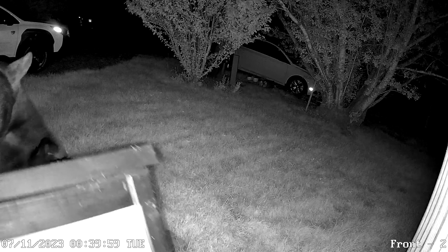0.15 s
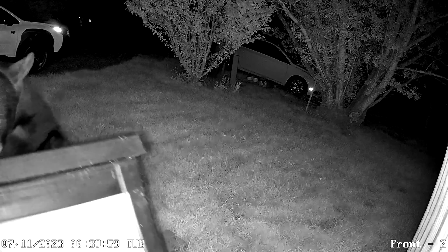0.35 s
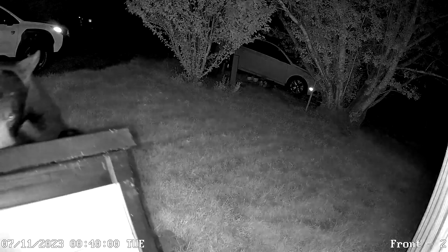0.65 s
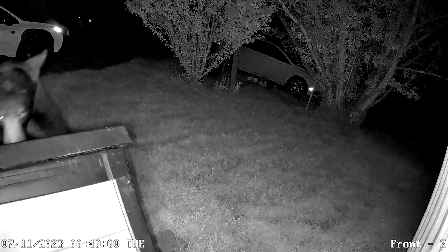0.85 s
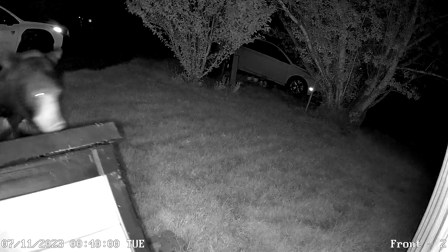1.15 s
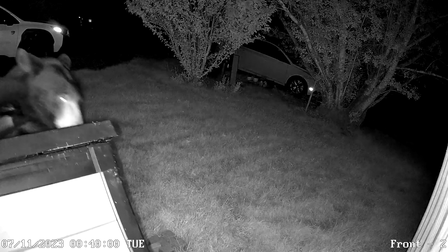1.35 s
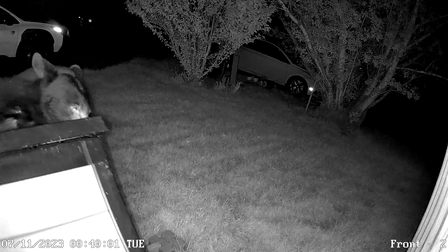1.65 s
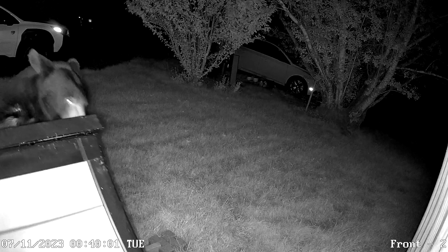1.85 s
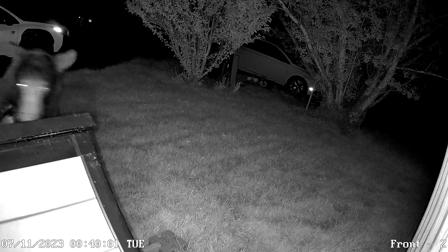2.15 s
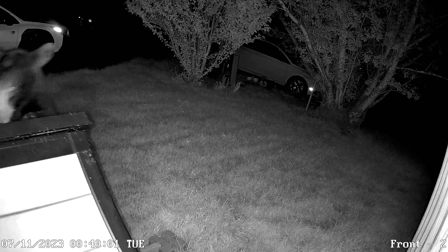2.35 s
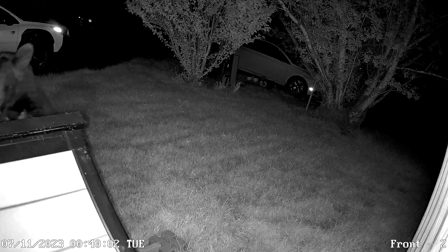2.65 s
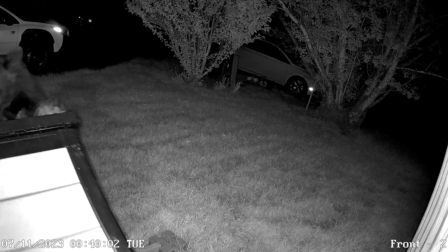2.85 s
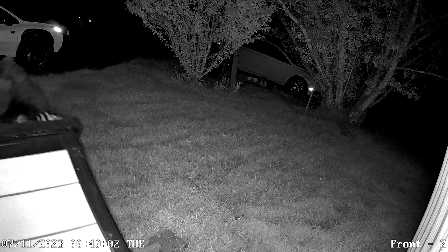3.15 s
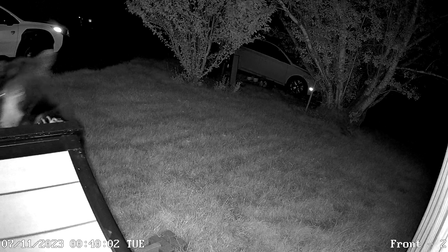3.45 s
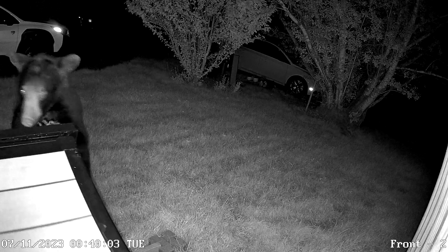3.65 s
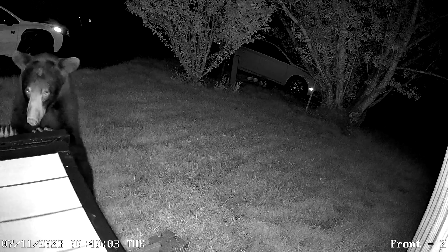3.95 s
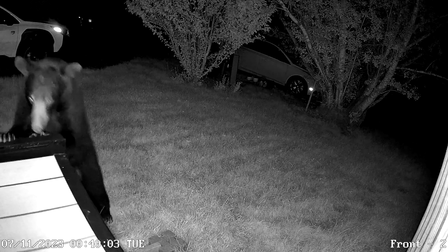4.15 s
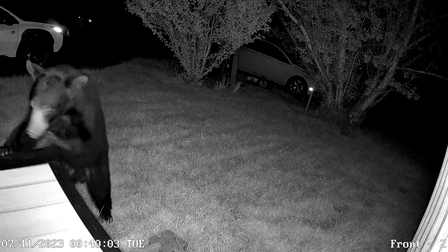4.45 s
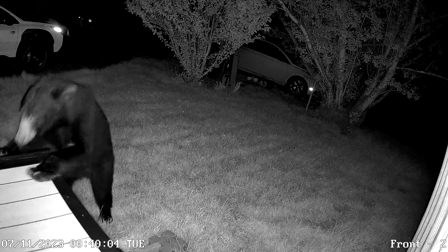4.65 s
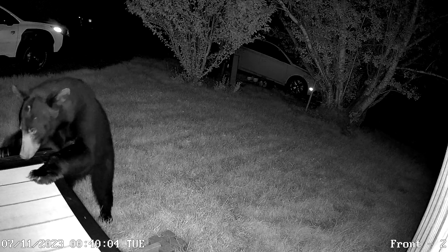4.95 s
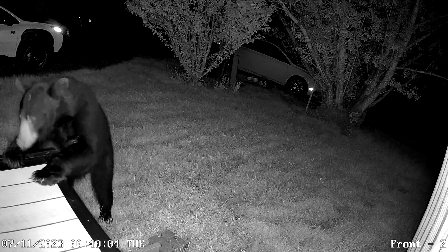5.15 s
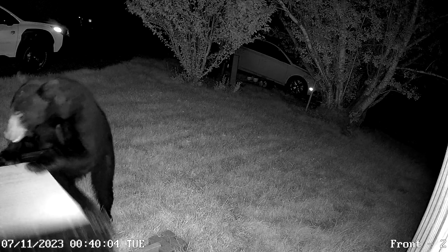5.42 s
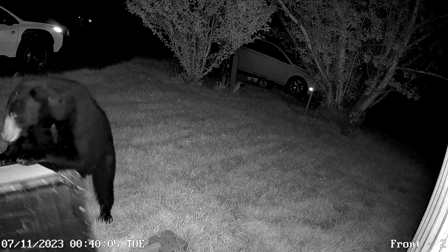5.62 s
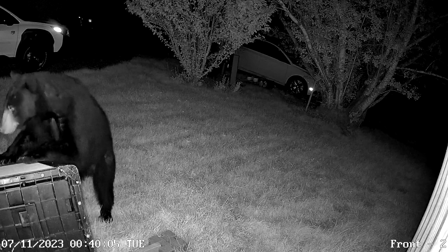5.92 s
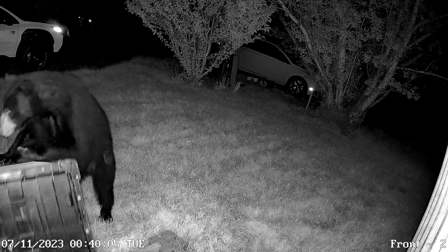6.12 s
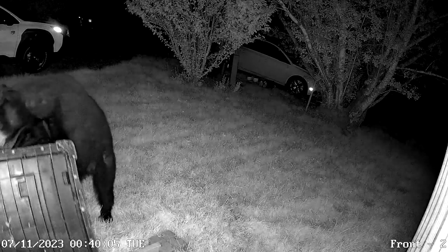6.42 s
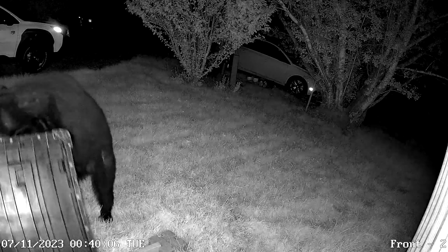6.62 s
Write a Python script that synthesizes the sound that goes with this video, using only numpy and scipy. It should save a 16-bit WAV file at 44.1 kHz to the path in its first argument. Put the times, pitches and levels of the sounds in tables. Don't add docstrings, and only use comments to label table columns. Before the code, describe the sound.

Claws scrape a hard plastic box outdoors, then hollow bangs and gritty dragging build to a loud overloaded slam, followed by faint scratching and two late thumps.

```python
import sys
import numpy as np
from scipy import signal
from scipy.fft import rfft, irfft
from scipy.io import wavfile
from scipy.ndimage import uniform_filter1d

SR = 44100
rng = np.random.default_rng(int(sys.argv[2]) if len(sys.argv) > 2 else 0)


def transcribe(signal):
    frames = np.atleast_2d(signal).T
    limited = np.clip(frames, -1, 1)
    pcm = np.round(limited * 32767).astype(np.int16)
    wavfile.write(sys.argv[1], SR, pcm)


def amplitude_ratio(level_db):
    exponent = np.asarray(level_db, float) / 20
    return 10 ** exponent


N = 298998

RESTING_DB = [-70.5, -73.5, -56, -68]


def drag():
    judder = amplitude_ratio(2.12 * drift(41.0))
    return scraping(judder) + shoving(judder)


# start_s, hold_s, scrape_db, rasp_relative_db
SCRAPES = [(0, 0.039, -52, -11), (.28, 0.24, -56.5, -12), (.5, 0.017, -56.5, -10.5),
           (.62, 0.065, -58.5, -11.5), (.99, 0.14, -44, -11.5), (.12, .1, -60.5, -8),
           (1.14, .17, -40, -11.5), (1.33, 0.078, -47.5, -16), (2.67, .03, -62, -5), (2.92, .02, -55, -6),
           (2.98, .04, -47.5, -14), (3.06, .12, -43.5, -5.5), (3.2, .05, -40.5, -8.5),
           (3.27, 0.026, -32, -4), (3.32, 0.039, -36.5, -8), (3.42, 0.11, -47, -3.5),
           (3.56, 0.012, -49, 5.5), (3.68, 0.19, -50, -1.5), (3.97, 0.061, -52.5, -3),
           (4.09, 0.055, -44.5, -5.5), (4.275, 0.013, -48, 3.5), (4.35, .07, -41.5, -1.5),
           (4.45, 0.033, -30, -6), (4.5, 0.015, -27, -3), (4.55, 0.03, -36, -10), (4.62, 0.037, -40.5, -8),
           (4.8, 0.25, -72, 7.5), (5.07, 0.051, -57.5, -7.5), (5.62, 0.31, -69.5, 1.5),
           (4.69, .05, -48, -13), (6.23, 0.14, -63, -3.5)]
# start_s, hold_s, scrape_db, rasp_relative_db
SKIDS = [(1.104, 0.026, -35.5, -14), (2.003, 0.016, -57, -7), (2.942, 0.017, -39.5, -5.5),
         (3.184, .015, -41.5, -10), (3.272, .02, -39, -4), (3.801, .012, -53, -5),
         (3.922, 0.0069, -29.5, -14.5), (4.254, .012, -44.5, 2.5), (4.635, .015, -38, -1.5),
         (5.578, 0.0038, -54, -2.5), (5.361, 0.0053, -53.5, -13), (5.716, 0.025, -45, -15),
         (6.262, .01, -52, -12)]
# mode_hz, width_hz, level_db
RIBS = [(1050, 646, 7), (1234, 1041, 7.5), (1693, 500, 3.5), (2290, 670, -3), (2478, 1090, -5)]
# mode_hz, width_hz, level_db
GRIT = [(3300, 1100, 2), (4300, 520, 3.5), (4700, 480, 1.5), (5400, 480, 0), (6870, 1300, -14)]


def scraping(judder):
    scrape, rasp = strokes(SCRAPES, 301, 173.5, *RESTING_DB[:2])
    skid, skid_rasp = strokes(SKIDS, 3997.5, 500.5, -100, -100)
    scrape = np.hypot(scrape, skid)
    rasp = np.hypot(rasp, skid_rasp)
    claws = slips(5000, spread_db=2.5) * judder
    grains = slips(6000, spread_db=3) * judder
    ribs = body(low_pass(claws, 2900, order=2), RIBS, patchy_db=0.9, rate=18)
    grit = body(claws + 1.2 * grains, GRIT, patchy_db=0.9, rate=18)
    return scrape * ribs + rasp * grit


# start_s, hold_s, boom_db, rumble_relative_db
SHOVES = [(0, 0.047, -44.5, -2), (.27, 0.15, -45.5, -0.3), (.48, 0.027, -40, -2), (.63, 0.083, -49, -3),
          (.96, .04, -42, -4), (1.04, 0.04, -27, -8), (.14, 0.085, -53.5, 2), (1.13, .1, -33, 3.5),
          (1.24, 0.021, -28, -9.5), (1.3, .12, -31, -4.5), (1.5, 0.12, -51.5, -8), (5.5, 0.17, -47.5, -8.5),
          (2.67, 0.084, -41, -5), (2.95, 0.081, -52.5, 11.5), (3.07, 0.032, -29, -12.5),
          (3.14, 0.069, -33.5, -0.2), (3.22, 0.083, -27.5, -2.5), (3.31, 0.076, -32, -2.3),
          (3.55, 0.023, -39, -8), (3.75, 0.069, -36, -8), (3.96, 0.014, -26.5, -10.5),
          (4.0, 0.11, -36.5, -9), (4.35, .025, -29, -10.5), (4.4, .1, -31.5, -4.5),
          (4.55, 0.038, -17, -5.5), (4.62, 0.087, -22, -10), (5.07, 0.053, -43.5, -8.5),
          (5.28, 0.064, -41, -10), (5.72, 0.083, -32, -23), (6.29, .13, -41, -14)]
# mode_hz, width_hz, level_db
BOX = [(29.4, 56, -12.5), (52.5, 29.4, 2), (94.7, 41.7, -4), (115.6, 39, -3)]
# mode_hz, width_hz, level_db
PANELS = [(197.4, 51, -3), (250, 33.6, 0), (297.3, 27, 3), (376.4, 25, 2.5), (448.8, 31, 0.5),
          (562.5, 77.6, -2), (722, 200, -12.5)]


def shoving(judder):
    boom, rumble = strokes(SHOVES, 249.5, 189, *RESTING_DB[2:])
    floor_force = low_pass(slips(400, spread_db=2), 180, order=3)
    panel_force = low_pass(slips(900, spread_db=3) * judder, 750, order=3)
    box = body(floor_force, BOX, patchy_db=1.2, rate=9)
    panels = body(panel_force, PANELS, patchy_db=2.54, rate=14)
    return boom * box + rumble * panels


# start_s, hold_s, loss_db
DIPS = [(.56, .04, -3), (.8, .1, -2), (1.47, .05, -1.5), (2.83, .07, -5), (4.2, .04, -1),
        (4.775, .07, -5.5), (6.05, .12, -2)]


def dipping():
    t = np.arange(N) / SR
    loss_db = sum(db * ((t > s) & (t < s + hold)) for s, hold, db in DIPS)
    fade_s = 0.02
    return amplitude_ratio(uniform_filter1d(loss_db * 1., size=int(fade_s * SR)))


# start_s, peak_db, pitch_hz, t60_s
THUDS = [(0.957, -31, 90, 0.11), (0.996, -21.5, 134.3, 0.13), (1.018, -14.5, 90, 0.088),
         (1.101, -13, 59, 0.063), (1.238, -28, 61.5, 0.048), (1.417, -34, 62, 0.12), (2.2, -44.5, 82, 0.2),
         (2.645, -34.5, 89, 0.15), (2.942, -10.5, 144, 0.08), (2.978, -18, 81, 0.25),
         (3.163, -21.5, 59.4, 0.17), (3.19, -19, 62.7, 0.2), (3.328, -24, 68.4, 0.18),
         (3.736, -29, 78, 0.16), (3.957, -23, 67.4, 0.11), (4.345, -29, 63.4, 0.12), (4.5125, 4.5, 88, 0.1),
         (4.5245, -7, 120, .06), (4.548, -2, 92, 0.1), (4.573, -9, 84, 0.1), (4.5845, -3, 105, 0.07),
         (4.6135, -5, 70, 0.07), (4.6345, 0, 92, 0.1), (4.647, -2, 84, 0.17), (4.72, -20, 56, .1),
         (4.748, -20.5, 82.7, 0.22), (5.243, -20, 66.5, 0.093), (5.299, -30.5, 60.6, 0.53),
         (5.718, -1.5, 88, 0.058), (5.757, -15.5, 90.6, 0.11), (6.237, -25.5, 69, 0.29),
         (6.2605, -7, 120, 0.04), (6.278, -6, 80, 0.075)]


def thuds():
    out = np.zeros(N)
    for s, db, hz, t60 in THUDS:
        t, shape = decay(t60, rise_s=0.0033)
        air = np.sin(2 * np.pi * hz * t)
        floor = 0.14 * np.sin(2 * np.pi * 0.62 * hz * t)
        add(out, s, amplitude_ratio(db + 2.5) * shape * (air + floor))
    return out


# start_s, peak_db, pitch_hz, t60_s
KNOCKS = [(0.058, -31, 236, 0.078), (0.218, -36.5, 504, 0.082), (0.28, -32, 552, 0.19),
          (0.45, -33.5, 331, 0.24), (0.503, -30, 244, 0.13), (0.686, -33, 622, 0.076),
          (0.957, -24, 263, 0.025), (0.996, -12, 184.5, 0.1), (1.102, -5.5, 621, 0.042),
          (1.119, -4, 360, 0.023), (1.42, -20.5, 256, 0.044), (2.204, -36.5, 230, 0.057),
          (2.647, -28.5, 228, 0.067), (2.715, -21.5, 396, 0.11), (2.731, -21.5, 292, 0.17),
          (2.944, -16, 355, 0.11), (2.953, -22, 362, 0.2), (3.033, -17, 315, 0.073),
          (3.18, -9.5, 245.5, 0.074), (3.51, -26, 418, 0.066), (3.802, -37.5, 363, 0.12),
          (3.921, -5, 419, 0.039), (4.347, -20.5, 195, 0.085), (4.508, -2.5, 225, 0.075),
          (4.639, -15, 184.5, 0.093), (5.218, -29, 430, 0.046), (5.716, -14, 260, 0.06),
          (6.24, -24.5, 200, 0.15), (6.2695, -10, 270, 0.07), (6.376, -32, 400, 0.06)]
# pitch_ratio, level_db
OVERTONES = [(0.738, -5.5), (1.45, -8), (2.101, -13.5)]


def knocks():
    out, noise = np.zeros(N), rng.standard_normal((len(KNOCKS), 14336))
    for (s, db, hz, t60), white in zip(KNOCKS, noise):
        t, shape = decay(min(t60, 0.2), rise_s=0.0015)
        sides = 0
        for ratio, part_db in OVERTONES:
            sides = sides + amplitude_ratio(part_db) * rough_tone(white, hz * ratio, 0.33 * hz * ratio)
        add(out, s, amplitude_ratio(db - 3) * shape * (np.sin(2 * np.pi * hz * t) + sides[:len(t)]))
    return out


# start_s, peak_db, pitch_hz
TAPS = [(.222, -35, 1670), (.285, -44, 2300), (.419, -34, 1640), (.452, -36, 1660), (.504, -28, 1450),
        (.69, -42, 1800), (.959, -32, 1500), (1.103, -9, 2270), (1.196, -18, 1050), (1.425, -28, 1004),
        (1.869, -49, 1340), (1.965, -50, 1130), (2.003, -37, 1050), (2.203, -41, 2580),
        (3.026, -24.5, 2030), (3.44, -31, 1190), (3.801, -25, 2180), (3.9986, -29, 5270),
        (4.098, -24.5, 2560), (4.253, -23.5, 2210), (4.2757, -29, 4530), (4.5181, -13, 2570),
        (4.676, -17, 880), (5.217, -31.5, 1105), (5.3, -36, 1050), (5.361, -36, 1500), (5.578, -27.5, 1134),
        (5.719, -21, 1300), (6.263, -26, 1040)]


def taps():
    return ticks(TAPS, t60_s=0.038, ring_share=0.83)


# start_s, peak_db, pitch_hz
CRACKS = [(.387, -42, 1470), (.991, -17, 1450), (4.889, -40, 3500), (2.184, -43, 890), (2.275, -40, 5170),
          (2.672, -40, 3500), (2.717, -50, 914), (4.49, -20, 5000), (2.946, -14, 1080), (3.184, -33, 1380),
          (3.271, -11.5, 1580), (3.515, -22.5, 2210), (3.559, -16.5, 3760), (3.683, -23, 5030),
          (3.922, -15, 1130), (4.326, -21, 4500), (4.357, -14, 5230), (4.43, -20, 1560), (4.641, -11, 1130),
          (4.863, -47, 3430), (4.878, -37, 2340), (5.013, -35, 1270), (5.033, -42, 3220),
          (5.1198, -34.5, 4370), (5.1348, -30.5, 4530), (5.848, -42, 2400), (5.921, -39.5, 2510),
          (5.579, -33, 4500), (6.231, -27, 4400), (6.379, -39, 1090)]


def cracks():
    return ticks(CRACKS, t60_s=0.017, ring_share=0.48)


def ticks(rows, t60_s, ring_share):
    out, noise = np.zeros(N), rng.standard_normal((len(rows), 10240))
    t, shape = decay(t60_s, rise_s=0.0012)
    for (s, db, hz), white in zip(rows, noise):
        crack = rough_tone(white, 2100, 3360)[:len(t)] * amplitude_ratio(-60 * t / 0.012)
        ring = rough_tone(white[::-1], hz, 0.18 * hz)[:len(t)] * shape
        add(out, s, amplitude_ratio(db - 9.5) * ((1 - ring_share) * 1.4 * crack + ring_share * ring))
    return out


# start_s, peak_db,
# pitch_hz, width_hz, t60_s
RINGS = [(.625, -47, 1000, 260, 0.31), (.62, -53, 1500, 200, .2), (0, -48, 1170, 200, .3),
         (.275, -49, 1550, 250, .2), (.44, -48, 1650, 200, .24), (.17, -46, 600, 150, .3),
         (.36, -44, 580, 150, .24), (.985, -35, 3500, 570, 0.23), (2.0, -35, 1037, 140, 0.17),
         (2.005, -40.5, 627, 200, 0.15), (2.01, -44.5, 1430, 130, 0.21), (2.0, -44.5, 2060, 190, 0.092),
         (2.667, -44, 1950, 380, 0.095), (3.1, -49, 1215, 290, 0.2), (3.965, -31, 3500, 470, 0.038),
         (5.36, -36, 3410, 200, 0.09), (5.36, -44, 3290, 60, .13), (5.36, -46, 3520, 90, .12),
         (2.43, -44.5, 174, 29, 0.32), (5.72, -25.5, 590, 360, 0.15), (1.098, -34, 3400, 980, 0.25),
         (5.725, -39.5, 2230, 1400, 0.12), (1.228, -33, 2000, 1100, .24), (1.23, -40, 3700, 1500, .24),
         (2.715, -42, 700, 500, .24), (2.74, -46, 1250, 500, .18), (2.635, -56, 2000, 300, .24),
         (5.74, -46, 3100, 300, .06), (6.232, -48, 1250, 200, .2), (4.51, -30, 1150, 200, .24),
         (4.61, -24, 480, 220, .12), (4.685, -30, 450, 120, .1), (6.262, -24, 520, 500, .13),
         (6.3, -36, 600, 500, .12), (6.31, -45.5, 4900, 350, 0.08), (4.507, -18, 650, 260, 0.061)]


def rings():
    out, noise = np.zeros(N), rng.standard_normal((len(RINGS), 16384))
    for (s, db, hz, width, t60), white in zip(RINGS, noise):
        t, shape = decay(min(t60, 0.24), rise_s=0.0032)
        add(out, s, amplitude_ratio(db) * shape * rough_tone(white, hz, width)[:len(t)])
    return out


# start_s, peak_db
SNAPS = [(.452, -40), (.96, -40), (1.423, -42), (2.9555, -24), (3.0277, -28), (3.08, -27), (3.182, -26),
         (3.2651, -20), (3.3784, -27), (3.4791, -34), (3.8, -33), (4.5185, -12), (4.598, -28), (4.632, -26),
         (4.7846, -46), (4.8235, -46), (4.8375, -45), (4.9243, -49), (4.9742, -44), (5.081, -44)]


def snaps():
    out, noise = np.zeros(N), rng.standard_normal((len(SNAPS), 2048))
    t, shape = decay(0.009, rise_s=0.0003)
    for (s, db), white in zip(SNAPS, low_pass(noise[:, :len(t)], 3600, order=2)):
        add(out, s, amplitude_ratio(db + 3) * shape * white)
    return out


# frequency_hz, density_db
NIGHT = [(12, -33), (20, 6), (114, -20), (241, -24), (439, -24.5), (797, -27), (1310, -43.5), (4910, -41.5),
         (5430, -36), (6960, -41.5), (7690, -58), (10000, -87), (16900, -120)]


def night():
    hz = np.arange(1, N // 2 + 2) * SR / N
    table_hz, table_db = np.transpose(NIGHT)
    colour = amplitude_ratio(np.interp(np.log(hz), np.log(table_hz), table_db))
    hiss = rms_one(irfft(rfft(rng.standard_normal(N)) * colour, N))
    level_db = -56 + 0.55 * drift(9.1)
    return amplitude_ratio(level_db) * hiss


def strokes(rows, rise_db_per_s, fall_db_per_s, rest_db, partner_rest_db):
    t = np.arange(0, N + 64, 64) / SR
    main, partner = amplitude_ratio(2 * rest_db), amplitude_ratio(2 * partner_rest_db)
    for s, hold, db, partner_db in rows:
        rise = rise_db_per_s * np.maximum(s - t, 0)
        fall = fall_db_per_s * np.maximum(t - s - hold, 0)
        power = amplitude_ratio(2 * (db - rise - fall))
        main = main + power
        partner = partner + power * amplitude_ratio(2 * partner_db)
    return [np.interp(np.arange(N) / SR, t, np.sqrt(p)) for p in (main, partner)]


def slips(per_s, spread_db):
    sizes = amplitude_ratio(spread_db * np.minimum(rng.exponential(1, N), 4)) * rng.choice([-1, 1], N)
    return sizes * (rng.random(N) < per_s / SR) + 1e-18


def body(force, modes, patchy_db, rate):
    out = 0
    for k, (hz, width, db) in enumerate(modes):
        r = np.exp(-np.pi * width / SR)
        fed = force * amplitude_ratio(db + patchy_db * drift(rate)) * (-1) ** k
        poles = [1, -2 * r * np.cos(2 * np.pi * hz / SR), r * r]
        out = out + signal.lfilter([1 - r * r, 0, r * r - 1], poles, fed)
    return rms_one(out)


def decay(t60, rise_s):
    t = np.arange(int(1.3 * t60 * SR)) / SR
    return t, amplitude_ratio(-60 * t / t60) * (1 - np.exp(-t / rise_s)) ** 2


def rough_tone(white, hz, width):
    edges = [max(hz - width / 2, 50), hz + width / 2]
    band = signal.butter(2, edges, "band", fs=SR, output="sos")
    return rms_one(signal.sosfilt(band, white)[2048:])


def drift(rate):
    r = np.exp(-2 * np.pi * rate / SR)
    return rms_one(signal.lfilter([1], [1, -2 * r, r * r], rng.standard_normal(N + SR))[SR:])


def low_pass(x, hz, order):
    return signal.sosfilt(signal.butter(order, hz, fs=SR, output="sos"), x)


def rms_one(x):
    return x / np.sqrt(np.mean(x ** 2) + 1e-20)


def add(out, s, sound):
    at = round(s * SR)
    out[at:at + len(sound)] += sound[:N - at]


def scene():
    bin_sound = drag() * dipping() + thuds() + knocks() + taps() + cracks() + rings() + snaps()
    notched = signal.lfilter(*signal.iirnotch(830, 3.5, fs=SR), bin_sound)
    bin_sound = 0.51 * notched + 0.39 * bin_sound
    dull = signal.lfilter([0.4], [1, -0.6], bin_sound)
    out = bin_sound + night()
    add(out, 0.012, amplitude_ratio(-21) * dull)
    add(out, 0.027, amplitude_ratio(-16.5) * dull)
    return out[None]


def band_limit(x):
    return signal.sosfilt(signal.butter(12, 7840, fs=SR, output="sos"), x)


# start_s, end_s
NARROW = [(.936, 1.128), (1.96, 2.024), (2.92, 2.984), (3.88, 3.944), (4.2, 4.264), (5.352, 5.416),
          (5.672, 5.736), (6.248, 6.312)]


def record(dry):
    x = signal.lfilter(*signal.iirnotch(5900, 25, fs=SR), dry)
    narrow = signal.sosfiltfilt(signal.ellip(8, 0.3, 45, 4560, fs=SR, output="sos"), x)
    t = np.arange(N) / SR
    gate = sum((t > start) & (t < end) for start, end in NARROW)
    gate = uniform_filter1d(gate * 1., size=130)
    x = x + gate * (narrow - x)
    x = signal.sosfilt(signal.cheby2(12, 50, 7900, fs=SR, output="sos"), x)
    x = np.clip(x, -0.97, 0.97)
    return band_limit(x)


dry = scene()
out = record(dry)
transcribe(out)
```